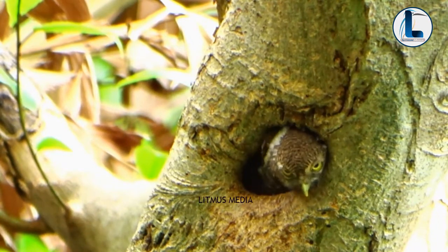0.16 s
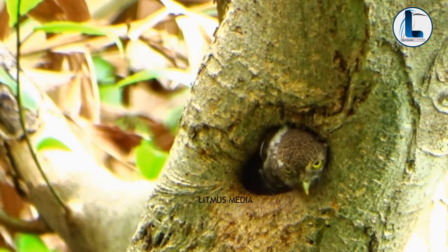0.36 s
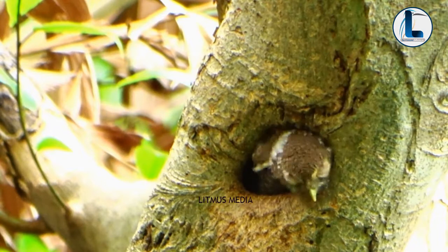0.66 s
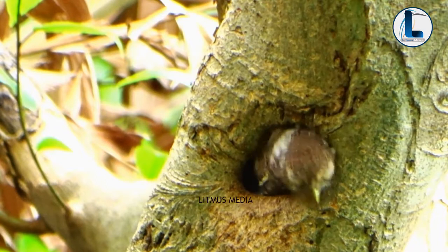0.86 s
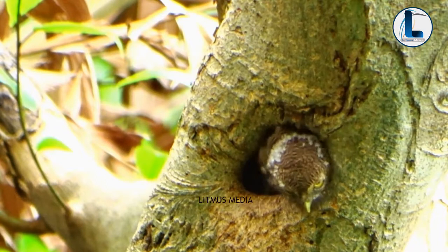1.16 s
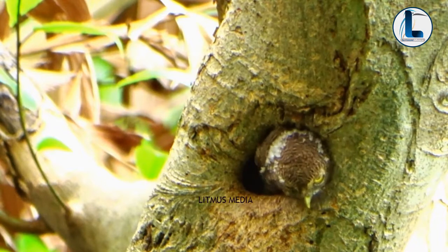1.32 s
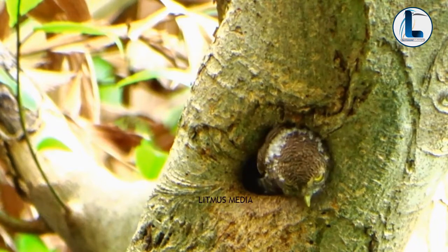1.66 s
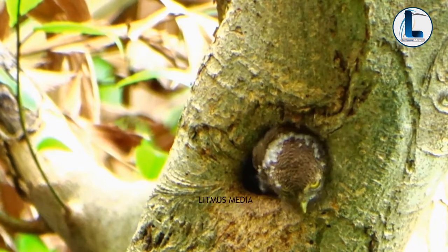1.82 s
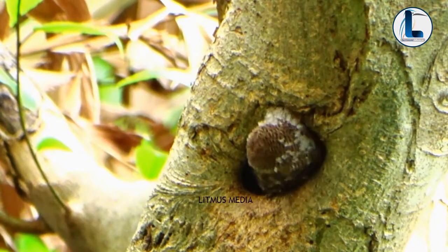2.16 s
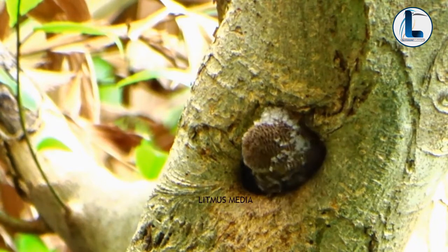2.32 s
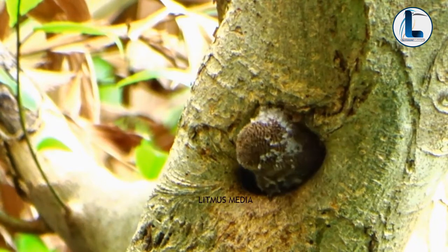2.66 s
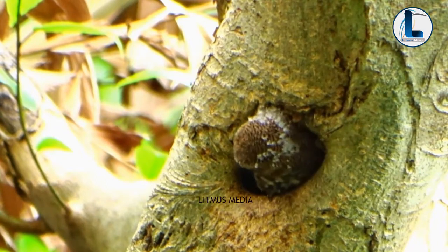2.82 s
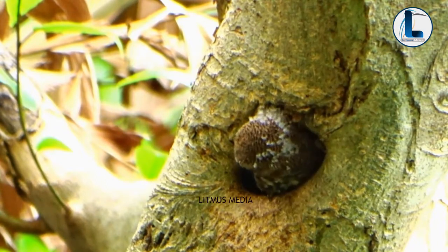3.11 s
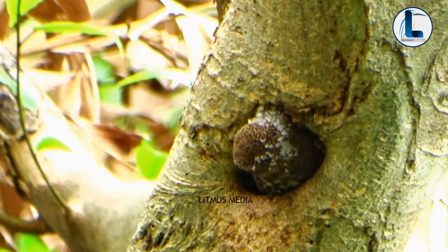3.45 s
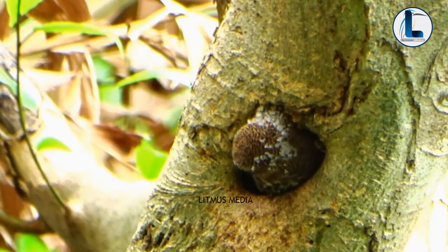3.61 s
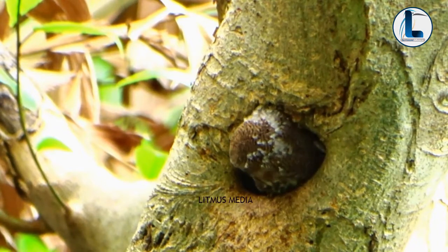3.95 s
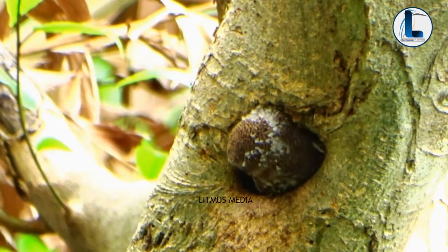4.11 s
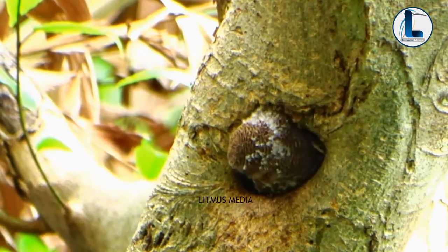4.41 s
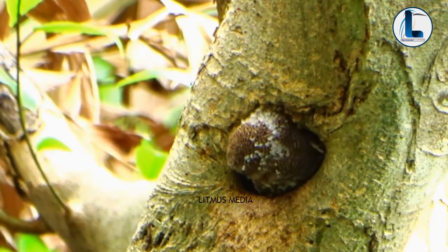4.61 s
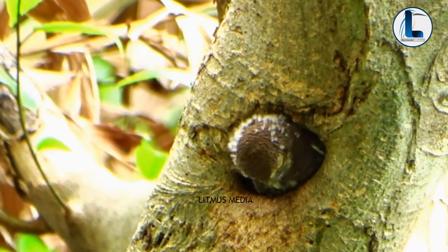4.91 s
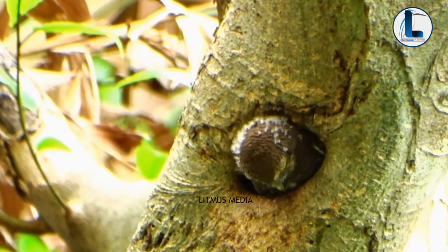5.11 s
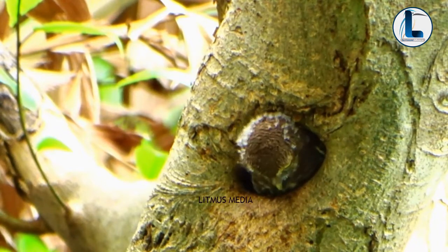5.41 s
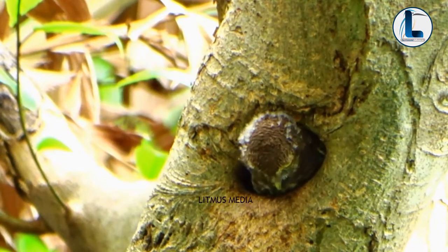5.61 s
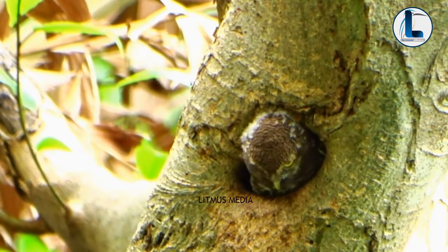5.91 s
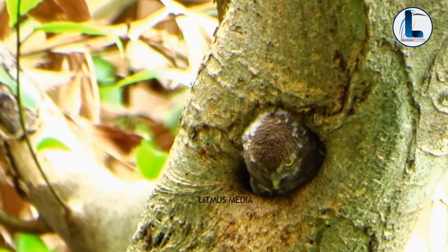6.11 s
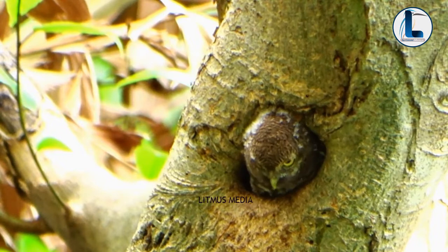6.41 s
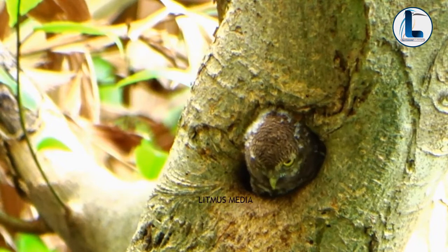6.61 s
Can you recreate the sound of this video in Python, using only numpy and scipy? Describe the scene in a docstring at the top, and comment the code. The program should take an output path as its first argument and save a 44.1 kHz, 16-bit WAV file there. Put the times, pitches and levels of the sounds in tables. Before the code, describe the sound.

Soft, regular hoots from a small owl echo lightly among trees, with high insect buzzing, crickets and a faint airy hiss behind.

```python
"""A shrill insect drone fades away over the hiss of a wood, an insect chorus, a far trill and a far cricket.
Almost at once an owlet in a tree hole starts eight even hoots, each a soft arched note and then a quick
falling warble; the trunks throw them back. A rattling cricket joins in with its wings, and leaves stir.
Near three seconds a high cricket starts and a bird gives one rising whistle.
Just before the last hoot, a second owlet answers once from far off."""
import sys
import numpy as np
from scipy import signal
from scipy.fft import rfft, irfft
from scipy.io import wavfile
from scipy.ndimage import uniform_filter1d

SR = 44100
rng = np.random.default_rng(int(sys.argv[2]) if len(sys.argv) > 2 else 0)


def file_out(sig):
    """Save sig as 16-bit WAV at sys.argv[1]."""
    # one column per channel
    cols = np.atleast_2d(sig).T
    # limit, then scale
    lim = np.clip(cols, -1, 1)
    pcm = np.round(lim * 32767).astype(np.int16)
    wavfile.write(sys.argv[1], SR, pcm)


N = 298116
TIME, FREQS = np.arange(N) / SR, np.fft.rfftfreq(N, 1 / SR)


def gain_of(db):
    """Turns decibels into a number to multiply by."""
    return 10 ** (np.asarray(db) / 20)


def unit_level(x):
    """Scales a signal to an average power of one."""
    return x / np.sqrt(np.mean(abs(x) ** 2) + 1e-30)


def at_time(points, time_s):
    """Reads between the rows of a (time, value) table."""
    return np.interp(time_s, *np.transpose(points))


def spectrum(points):
    """Spreads a (pitch, value) table over all frequencies."""
    hz, value = np.transpose(points)
    return np.interp(np.log(FREQS + 1), np.log(hz + 1), value)


def add(mix, start_s, sound):
    """Mixes a sound in, dropping what does not fit."""
    start = round(start_s * SR)
    part = mix[..., max(start, 0):max(start + sound.shape[-1], 0)]
    part += sound[..., max(-start, 0):][..., :part.shape[-1]]


def pan(x, left_db):
    """Leans a sound to the left by making that side louder; below zero it leans right."""
    return x * gain_of([[left_db / 2], [-left_db / 2]])


def band(hz, width_hz):
    """A steep hill in the spectrum around one pitch."""
    return 1 / (1 + ((FREQS - hz) / width_hz) ** 2) ** 2


def noise(shape, likeness=1):
    """Stereo noise with a given spectrum; at likeness 1 both sides are the same."""
    left, other = rfft(rng.standard_normal((2, N)))
    right = likeness * left + np.sqrt(1 - likeness ** 2) * other
    return unit_level(irfft(np.array([left, right]) * shape, N))


def wander(rate_hz):
    """A smooth random curve, about one in size."""
    return unit_level(irfft(rfft(rng.standard_normal(N)) * band(0, rate_hz), N))


def ripple(depth_db):
    """Fine, steady peaks and dips across a spectrum give the hiss a faint ring."""
    bumps = unit_level(uniform_filter1d(rng.standard_normal(len(FREQS)), size=180))
    return gain_of(depth_db * np.tanh(bumps))


def sine(hz):
    """A pure wave that follows a changing pitch."""
    return np.sin(2 * np.pi * np.cumsum(hz) / SR)


def swell(middle_s, length_s):
    """A smooth rise and fall around a moment."""
    out = np.zeros(N)
    add(out, middle_s - length_s / 2, signal.windows.hann(int(length_s * SR)) ** .5)
    return out


def woods(x, decay_s, rise_s):
    """Leaves and branches scatter a sound into many tiny echoes that build up, then die away."""
    t = np.arange(SR) / SR
    echoes = rng.choice([-1., 1.], (2, SR)) * (rng.random((2, SR)) < 3000 / SR)
    tail = echoes * gain_of(-60 * t / decay_s) * (1 - np.exp(-(t / rise_s) ** 2))
    scattered = signal.fftconvolve(x[None], tail, axes=1)[:, :N]
    return scattered * x.std() / scattered.std(axis=1, keepdims=True)


def insect_drone(throb_db=2.5, grain_db=2.1):
    """Wings ring at a few wavering pitches over a grainy rasp; the ringing fades first."""
    # how the drone fades: time_s, ring_db, rasp_db
    levels = [(0, -38, -43.5), (.3, -39, -48), (.6, -44, -47), (1.1, -47.5, -47), (1.6, -51, -50),
              (2.2, -68, -50), (2.8, -71, -53), (3.4, -85, -58), (4.2, -72, -62.5), (6.76, -89, -69)]
    # the ringing tones, weighed against each other: pitch_hz, waver_hz, level_db, fade_db_per_s
    tones = [(8426, 14, 2, 5), (8190, 16, -9, -1), (8231, 14, -6, 1), (8273, 14, -9, -1), (8380, 60, -5, 0),
             (8620, 50, -12, 1), (8825, 20, -13, -1), (9068, 10, -17, -1)]
    # the colour of the rasp: pitch_hz, relative_db
    rasp_colour = [(6500, -58), (7400, -34), (7850, -10), (8200, 0.5), (8450, -3.5), (8800, -5.5),
                   (9100, -12.5), (9400, -24), (10300, -29), (11500, -37)]
    sizes = np.array([gain_of(db - fade * TIME) for _, _, db, fade in tones])
    waves = [sine(hz + waver_hz * wander(rate_hz=88.5)) for hz, waver_hz, *_ in tones]
    ring = (sizes * waves).sum(0) / np.linalg.norm(sizes, axis=0)
    rasp = noise(gain_of(spectrum(rasp_colour)) * ripple(depth_db=3), likeness=.85)
    ring = unit_level(ring * gain_of(throb_db * wander(rate_hz=115)))
    rasp = unit_level(rasp * gain_of(grain_db * wander(rate_hz=500)))
    time_s, ring_db, rasp_db = np.transpose(levels)
    ring *= gain_of(np.interp(TIME, time_s, ring_db))
    rasp *= gain_of(np.interp(TIME, time_s, rasp_db))
    return pan(ring + rasp, left_db=-.5)


def air(wind_db=-65, gust_db=.6, fade_db=3, fizz_db=-60.5):
    """A soft wash of wind, a faint dying rumble, and the fizz of the smallest insects to the right."""
    # the colour of wind and far noise: pitch_hz, relative_db
    wind_colour = [(10, -22), (28, -12), (42, -10), (60, -6), (90, 0), (120, 1), (180, -1.5), (280, 1.5),
                   (520, 4.5), (750, 1), (1100, 4.5), (1550, 5), (1850, -5.5), (2700, -3.5), (3150, -3.5),
                   (3500, -8.5), (4200, -4), (6000, -2), (16000, -32.5)]
    # how alike the wind is in both ears: pitch_hz, likeness (-1 to 1)
    wind_likeness = [(30, 0.74), (60, 1), (125, 0.92), (250, -0.03), (500, -0.42), (1000, -0.45),
                     (2500, -0.0097), (6000, 0.89)]
    # how the rumble dies away: time_s, level_db
    rumble_levels = [(0, -81.5), (2.7, -87.5), (3.3, -86), (4.7, -91), (5.2, -103), (6.76, -100)]
    # the colour of the fizz: pitch_hz, relative_db
    fizz_colour = [(5000, -26), (7000, -8), (9800, -3.5), (10800, -7.5), (12300, 0.5), (13200, -2.5),
                   (14200, 5), (16000, -2.5)]
    wind = noise(gain_of(spectrum(wind_colour)), likeness=spectrum(wind_likeness))
    wind *= gain_of(wind_db + gust_db * wander(rate_hz=3) + fade_db * np.linspace(.5, -.5, N))
    rumble = noise(band(hz=42, width_hz=12)) * gain_of(at_time(rumble_levels, TIME))
    fizz = noise(gain_of(spectrum(fizz_colour)) * ripple(depth_db=3.5), likeness=.71)
    fizz *= gain_of(fizz_db + 1.1 * wander(rate_hz=200))
    return wind + rumble + pan(fizz, left_db=-2)


def insect_chorus(flicker_db=1.97):
    """Many distant insects merge into flickering bands of noise; two of the bands pulse."""
    # the bands: pitch_hz, width_hz, start_db, end_db, pulses_per_s, pulse_depth (0 to 1)
    bands = [(4150, 250, -66, -80, 0, 0), (4820, 570, -66, -69.5, 0, 0), (5730, 600, -71, -76.5, 0, 0),
             (7020, 260, -68.5, -71, 8.6, .28), (7820, 220, -66, -73, 17, .45),
             (8480, 530, -59.5, -57, 0, 0), (14640, 1100, -64, -63.5, 0, 0), (15560, 600, -61, -61, 0, 0)]
    out = np.zeros((2, N))
    for hz, width_hz, start_db, end_db, rate, depth in bands:
        pulse = 1 + depth * sine(rate * (1 + .08 * wander(rate_hz=3))) if depth else 1
        buzz = noise(band(hz, width_hz) * ripple(depth_db=4.5), likeness=.92)
        buzz = unit_level(buzz * pulse * gain_of(flicker_db * wander(rate_hz=134)))
        out += pan(buzz * gain_of(np.linspace(start_db, end_db, N)), left_db=-3.5 * (hz / 15000) ** 2)
    return out


def far_trill(hz=2170, width_hz=260, purr_db=.5):
    """Distant callers blend into one narrow, unevenly purring band."""
    # how loud the trill is: time_s, level_db
    levels = [(0, -63), (.8, -65), (1.4, -67.5), (2.2, -72), (3, -70.5), (4.4, -77.5), (4.85, -70),
              (5.4, -78), (5.7, -70.5), (6.76, -71.5)]
    purr = noise(band(hz, width_hz), likeness=.4) * gain_of(purr_db * wander(rate_hz=40))
    return unit_level(purr) * gain_of(at_time(levels, TIME))


def far_cricket(first_s=.005, hz=4660, width_hz=380, chirp_s=.17, strokes_per_s=70, uneven_db=1):
    """An unbroken beat of throbbing chirps, smeared by distance into puffs of noise."""
    # the beat, which quickens a little: time_s, chirps_per_s
    tempo = [(0, 4.4), (2.3, 4.4), (2.9, 4.65), (4.7, 4.45), (5.2, 5.05), (6.76, 5.1)]
    # how loud the chirps are: time_s, level_db
    levels = [(0, -63), (1.55, -62.5), (1.9, -57.5), (2.7, -57), (3.15, -64.5), (4.5, -63.5), (6.1, -65.5),
              (6.76, -62.5)]
    chirps_so_far = np.cumsum(at_time(tempo, TIME)) / SR
    beats_s = first_s + np.interp(np.arange(chirps_so_far[-1]), chirps_so_far, TIME)
    loudness = sum(gain_of(at_time(levels, s) + uneven_db * rng.standard_normal()) * swell(s, chirp_s)
                   for s in beats_s)
    throb = 1 + .2 * sine(strokes_per_s + 10 * wander(rate_hz=9.8))
    return pan(loudness * throb * noise(band(hz, width_hz), likeness=.75), left_db=-2.2)


def owlet_voice(notes, leap_hz, crest, lateness, rasp_db):
    """Nearly pure notes with a soft rasp: each leaps up to its top pitch, then slides down."""
    # the overtone above each note: pitch_multiple, relative_db
    overtones = [(2, -21.5)]
    voice = np.zeros(N)
    for start_s, length_s, db, top_hz, end_hz in notes:
        progress = np.linspace(0, 1, int(length_s * SR))
        jitters = uniform_filter1d(rng.standard_normal((2, N // 20)), size=80)
        shake, flutter = (unit_level(jitter)[:len(progress)] for jitter in jitters)
        rise = np.clip(1 - progress / crest, 0, 1)  # crest is the share of the note spent rising
        fall = np.clip((progress - crest) / (1 - crest), 0, 1)
        hz = (top_hz - leap_hz * rise ** 2 + (end_hz - top_hz) * fall ** 1.3) * (1 + .002 * shake)
        phase = 2 * np.pi * np.cumsum(hz) / SR
        tone = np.sin(phase) + sum(gain_of(over_db) * np.sin(k * phase) for k, over_db in overtones)
        effort = abs(np.sin(np.pi * progress ** lateness)) ** .9  # lateness above 1 delays the peak
        rasp_size = gain_of(rasp_db) * np.sin(np.pi * progress ** (1 / 3)) ** 4  # strongest on the leap
        rasp = rasp_size * (1 + flutter / 2) * np.sin(1.5 * phase)  # half-way up to the overtone
        add(voice, start_s, np.sqrt(2) * gain_of(db) * (effort * tone + rasp))
    return voice


def warble(start_s, level_db, stress_db, hz, end_spread=.015):
    """Lists the four falling notes of a warble; the stress acts most on the last."""
    # the notes: delay_s, length_s, relative_db, top_pitch and end_pitch (shares of hz)
    slides = [(0, .036, -1.4, .96, .825), (.0315, .033, .7, 1, .82), (.0705, .044, -3.3, .98, .78),
              (.117, .05, -15.2, .92, .74)]
    last_s = slides[-1][0]
    notes = []
    for delay_s, length_s, db, top, end in slides:
        note_db = level_db + db + stress_db * (delay_s / last_s) ** 3
        end_hz = end * hz * (1 + end_spread * rng.standard_normal())
        notes.append((start_s + delay_s, length_s, note_db, top * hz, end_hz))
    return notes


def owlet(sag_hz=90):
    """Each hoot is an arched note and a warble; trunks echo it and branches scatter it."""
    # the hoots: start_s, length_s, level_db, pitch_hz, warble_start_s, warble_db, stress_db, warble_hz
    hoots = [(.1863, .082, -45, 1103, .3193, -42.8, 2, 1190),
             (1.017, .088, -45.5, 1104, 1.151, -44.9, 5, 1180),
             (1.8451, .087, -47.3, 1102, 1.978, -43.3, -1, 1178),
             (2.6603, .075, -44.8, 1096, 2.788, -44.1, 1, 1168),
             (3.4987, .077, -45.5, 1100, 3.627, -44, -4, 1180),
             (4.3274, .0695, -44.7, 1092, 4.455, -44.9, -4.5, 1170),
             (5.1634, .073, -46, 1098, 5.288, -44.3, 0, 1174),
             (6.0015, .077, -43.5, 1085, 6.134, -46.2, -3.5, 1156)]
    # echoes from nearby trunks: delay_s, relative_db, left_db
    trunks = [(0.012, -13, 3), (.031, -11.5, 3), (.0396, -14.5, -1), (.057, -15, -6), (.0624, -11.5, -2.5),
              (.0921, -19, 0)]
    arches = [(start_s, length_s, db, hz, hz - sag_hz) for start_s, length_s, db, hz, *_ in hoots]
    warbles = [note for hoot in hoots for note in warble(*hoot[4:])]
    voice = owlet_voice(arches, leap_hz=203, crest=.409, lateness=1.35, rasp_db=-32)
    voice += owlet_voice(warbles, leap_hz=90, crest=.2, lateness=1.07, rasp_db=-21)
    out = pan(voice, left_db=5.7)
    for delay_s, db, left_db in trunks:
        add(out, delay_s, pan(gain_of(db) * voice, left_db))
    high_notes = irfft(rfft(voice) * band(hz=1200, width_hz=600), N)
    out += gain_of(-9.8) * woods(high_notes, decay_s=.64, rise_s=.04)
    return out + gain_of(-17.2) * woods(voice, decay_s=1.1, rise_s=.076)


def rattling_cricket(chirp_s=.1, spacing_s=.15, strokes_per_s=83, stroke_s=.007):
    """Chirps come in threes; each is a run of wing strokes, each stroke a brief falling tone."""
    # the first chirp of each three, about a second apart: middle_s
    first_chirps = [.652, 1.733, 2.718, 3.73, 4.712, 5.692, 6.745]
    falling_hz = np.linspace(6060, 5430, int(stroke_s * SR))
    song = np.zeros(N)
    for middle_s in np.add.outer(first_chirps, spacing_s * np.arange(3)).ravel():
        for offset_s in np.arange(-chirp_s / 2, chirp_s / 2, 1 / strokes_per_s):
            detune, uneven_db, late = rng.standard_normal(3)
            stroke = unit_level(sine(falling_hz * (1 + .012 * detune)) * signal.windows.hann(len(falling_hz)))
            arch = np.cos(.85 * np.pi * offset_s / chirp_s)
            add(song, middle_s + offset_s + .00025 * late, gain_of(-55.5 + uneven_db) * arch * stroke)
    return gain_of(-1.5) * song + gain_of(-1.3) * woods(song, decay_s=.39, rise_s=.0014)[0]


def leaves():
    """Soft rustles, low stirrings and one tiny tick, each a swell of noise."""
    # stirrings in the wood: middle_s, length_s, pitch_hz, width_hz, level_db
    stirs = [(3.97, .42, 350, 280, -71.5), (3.8, .55, 6400, 1600, -65), (1.5, .5, 400, 300, -78),
             (5.35, .35, 330, 300, -78), (2.1, .5, 120, 40, -80), (2.85, .35, 120, 40, -82),
             (5.398, .005, 10000, 5000, -58)]
    return sum(gain_of(db) * swell(middle_s, length_s) * noise(band(hz, width_hz), likeness=.3)
               for middle_s, length_s, hz, width_hz, db in stirs)


def high_cricket(first_s=2.822, beat_s=.415, chirp_s=.09, stretch_s=.008, scrape_db=2.5):
    """Scraping chirps at an even beat slowly lengthen, while their wavering pitch creeps upward."""
    # how loud the chirps are against each other: time_s, level_db
    levels = [(2.8, -55), (3.25, -52.5), (4.07, -46), (4.9, -48.5), (5.3, -46.5), (5.7, -49), (6.13, -45.5),
              (6.55, -49.5)]
    start_hz, creep_hz_per_s, waver_hz = 8430, 76, 65
    loudness = sum(gain_of(at_time(levels, s)) * swell(s, chirp_s + k * stretch_s)
                   for k, s in enumerate(np.arange(first_s, N / SR, beat_s)))
    loudness *= unit_level(gain_of(scrape_db * wander(rate_hz=700)))
    song = loudness * sine(start_hz + creep_hz_per_s * (TIME - first_s) + waver_hz * wander(rate_hz=142))
    return song + gain_of(-9) * woods(song, decay_s=.26, rise_s=.006)


def bird(beak_hz=2700):
    """A rising whistle of three tones; the middle one is strongest and the beak damps the top one."""
    # the path of the strong middle tone: time_s, pitch_hz, level_db
    whistle = [(2.932, 2200, -75), (2.975, 2460, -60), (3.015, 2620, -57), (3.05, 3020, -54),
               (3.078, 3060, -53), (3.094, 3020, -66)]
    time_s, hz, db = np.transpose(whistle)
    t = np.arange(time_s[0], time_s[-1], 1 / SR)
    pitch_hz = np.interp(t, time_s, hz) * (1 + .013 * wander(rate_hz=190)[:len(t)])
    phase = np.pi * np.cumsum(pitch_hz) / SR  # the lowest tone, at half that pitch
    top_tone = gain_of(-15) * np.sin(3 * phase) / (1 + (pitch_hz / beak_hz) ** 12)
    tone = gain_of(-13.5) * np.sin(phase) + np.sin(2 * phase) + top_tone
    call = np.zeros(N)
    add(call, time_s[0], np.sqrt(2) * gain_of(np.interp(t, time_s, db)) * tone)
    return pan(call, left_db=-3) + gain_of(-7) * woods(call, decay_s=.8, rise_s=.014)


def far_owlet(start_s=5.808, step_s=.04, note_s=.039, loudest_s=5.905, peak_db=-58.5):
    """Five faint falling notes swell and sink, each starting lower; the wood blurs them."""
    top_hz, step_down_hz, end_hz = 1180, 22, 960
    notes = []
    for k in range(5):
        time_s = start_s + k * step_s
        db = peak_db - 9 * ((time_s - loudest_s) / .1) ** 2
        notes.append((time_s, note_s, db, top_hz - k * step_down_hz, end_hz))
    voice = owlet_voice(notes, leap_hz=90, crest=.13, lateness=1.1, rasp_db=-13)
    return voice + gain_of(-2.5) * woods(voice, decay_s=.51, rise_s=.023)


def scene():
    """Birds over insects over the air of the wood."""
    insects = insect_drone() + far_trill() + high_cricket() + rattling_cricket() + far_cricket()
    insects += insect_chorus()
    return owlet() + far_owlet() + bird() + insects + air() + leaves()


def record(dry):
    """Cuts away the very highest treble."""
    cutoff_hz = 15850
    low_pass = signal.firwin(1023, cutoff_hz, window=("kaiser", 9), fs=SR)
    return signal.oaconvolve(dry, low_pass[None], "same")


dry = scene()
out = record(dry)
file_out(out)
```